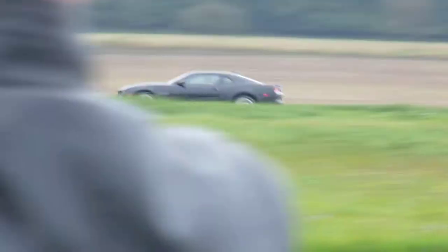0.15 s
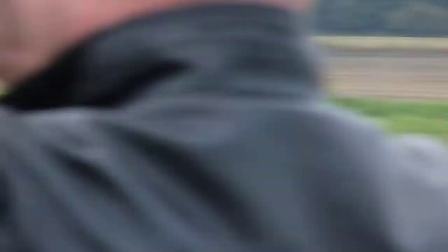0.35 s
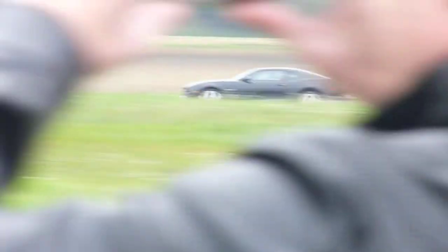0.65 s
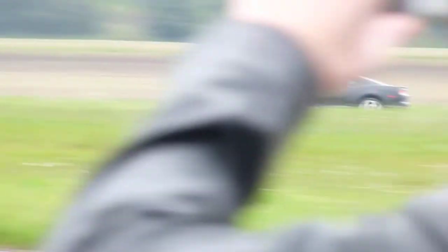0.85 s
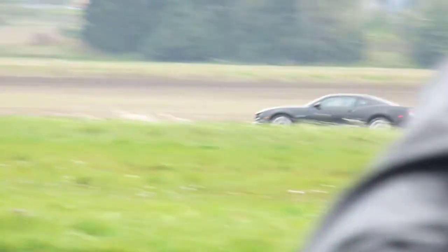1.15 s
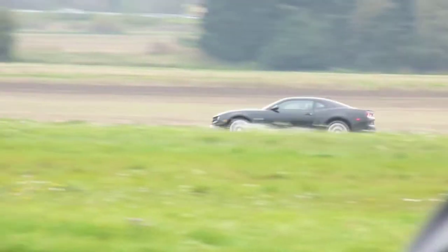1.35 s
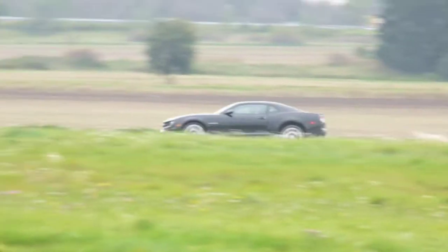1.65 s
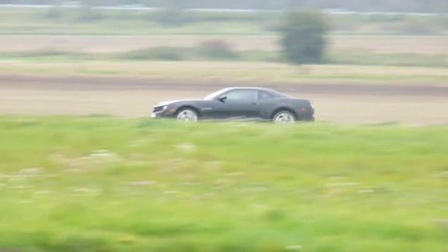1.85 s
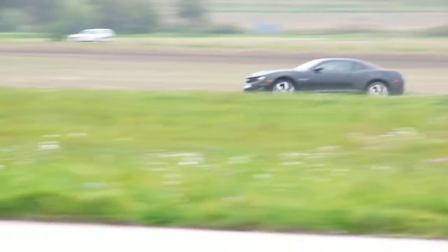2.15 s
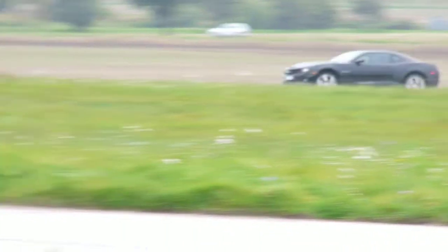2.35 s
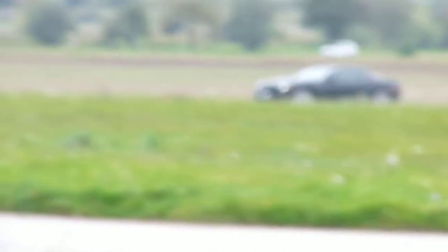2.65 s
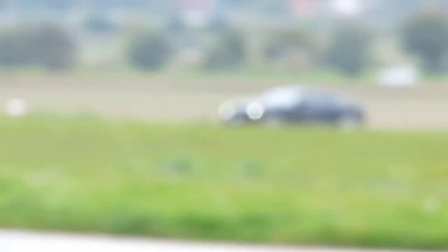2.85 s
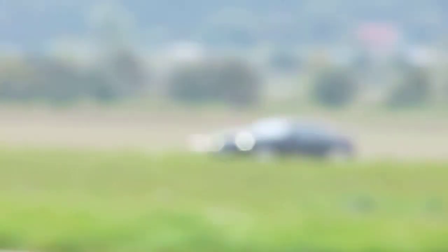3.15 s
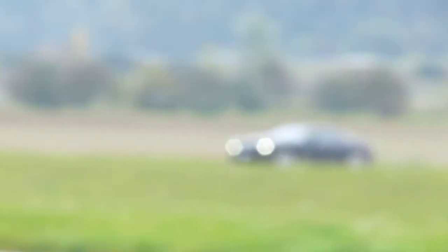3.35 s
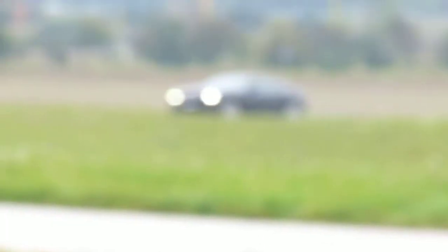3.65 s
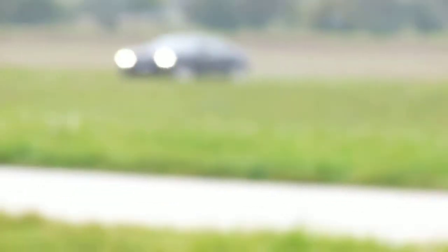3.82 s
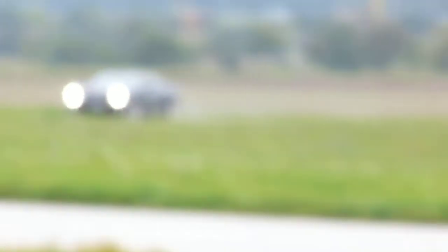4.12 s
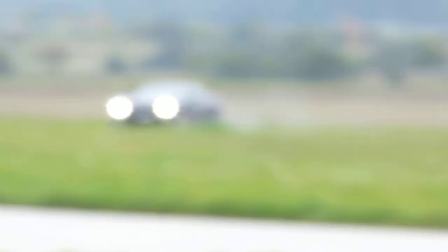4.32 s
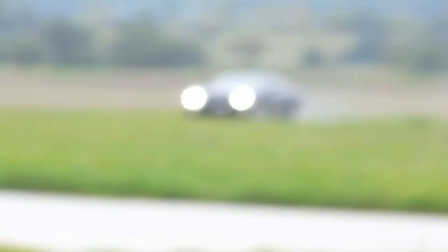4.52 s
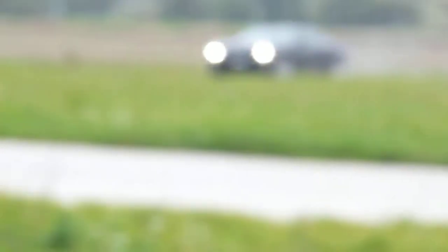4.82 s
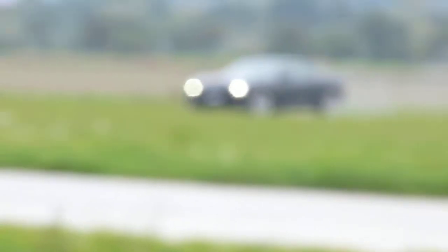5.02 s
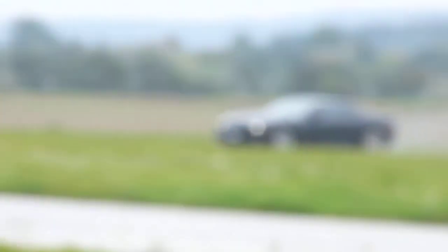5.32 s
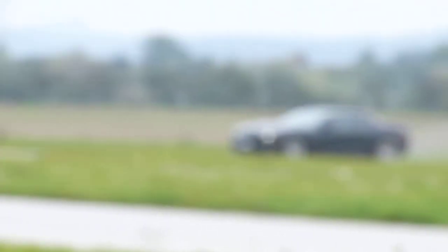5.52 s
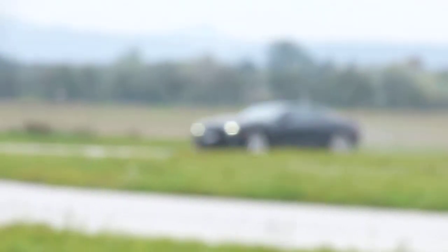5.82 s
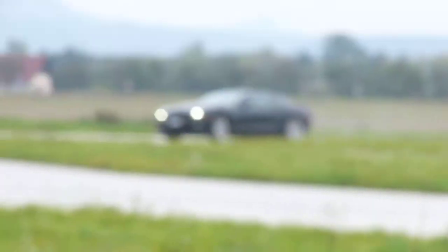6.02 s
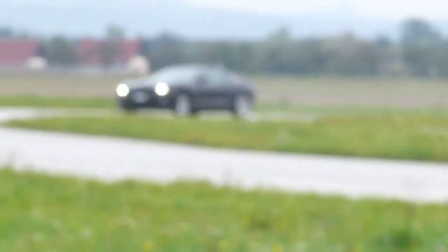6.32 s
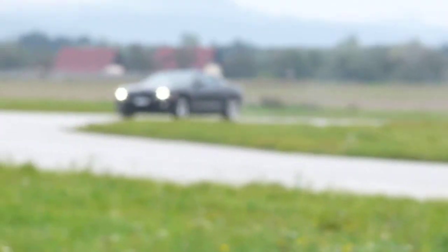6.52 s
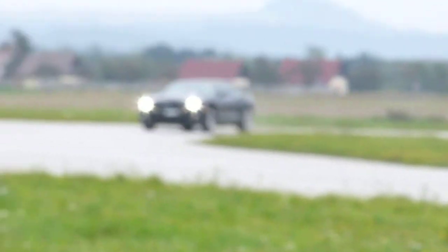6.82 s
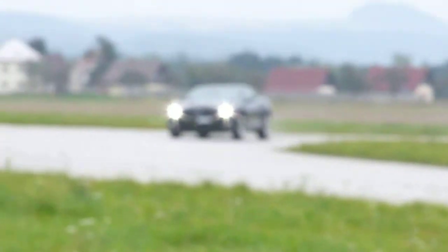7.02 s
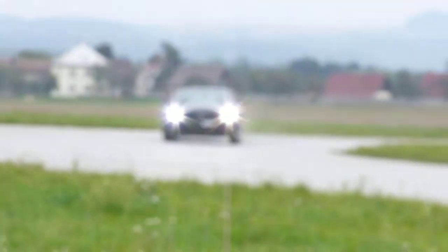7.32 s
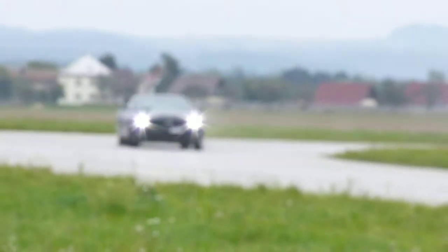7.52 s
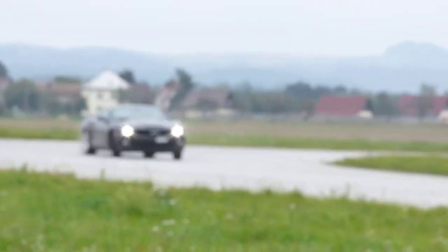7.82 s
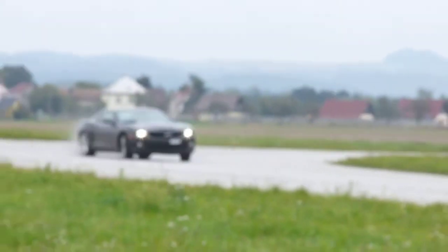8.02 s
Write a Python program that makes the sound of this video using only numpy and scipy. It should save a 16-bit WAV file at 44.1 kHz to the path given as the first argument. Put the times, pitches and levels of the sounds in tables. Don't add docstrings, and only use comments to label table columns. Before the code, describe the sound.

Distant heavy car slides through two bends, tyres squealing waveringly over scrubbing and low exhaust hum, with a strong wind gust buffeting the microphone between.

```python
import sys
import numpy as np
from scipy import signal
from scipy.fft import rfft, irfft, next_fast_len
from scipy.io import wavfile

SR = 44100
rng = np.random.default_rng(int(sys.argv[2]) if len(sys.argv) > 2 else 0)


def unload_audio(sound):
    columns = np.transpose(np.atleast_2d(sound))
    steps = np.round(np.clip(columns, -1, 1) * 32767)
    wavfile.write(sys.argv[1], SR, steps.astype(np.int16))


def voltage_ratio(level):
    return 10 ** (np.asarray(level, float) / 20)


N = 360297

# time in seconds, buffeting in dB.
WIND = [(0.3, -61.5), (1.09, -52.5), (2.07, -54), (3.0, -65), (3.48, -53), (4.84, -78), (4.99, -30.5),
        (5.04, -45), (5.23, -35), (5.29, -49), (5.36, -38.5), (5.5, -47.5), (5.56, -24), (5.67, -34.5),
        (6.56, -28), (7.4, -37.5), (7.59, -32.5), (8.17, -34.5)]
# frequency in Hz, density in dB per Hz.
BUFFET_COLOUR = [(18, -49.5), (30, -14), (126, -5), (302, -9), (802, -21), (922, -32), (1080, -28),
                 (1740, -40), (2550, -70.5), (3500, -81.5), (4550, -101), (7700, -120)]
# start in seconds, peak in dB.
EDDIES = [(0.106, -29), (0.282, -27), (0.748, -26.5), (0.866, -21.5), (1.065, -22), (1.363, -26),
          (2.854, -24.5), (3.225, -25), (3.293, -22), (3.356, -22), (3.812, -22.5), (3.859, -21),
          (3.967, -21.5), (4.31, -27), (4.896, -22), (5.208, -18.5), (5.353, -18.5), (5.421, -18.5),
          (5.546, -22), (5.65, -16), (5.774, -21), (5.81, -13.5), (6.044, -11), (6.112, -16.5),
          (6.209, -14), (6.255, -9.5), (6.532, -15), (7.03, -14), (7.539, -25), (8.104, -16)]
# start in seconds, peak in dB.
SNAPS = [(5.475, -31), (5.549, -37), (5.576, -25.5), (5.63, -26), (5.653, -20), (5.688, -25), (5.803, -27),
         (5.825, -17), (5.912, -43), (5.964, -25.5), (6.01, -23.5), (6.07, -25.5), (6.113, -27.5),
         (6.212, -17), (6.283, -19)]
RUMBLE_DB, RUMBLE_FOLLOWS = -39.5, 0.41
CLUSTER_DB, CLUSTER_S = 2.5, 0.16
SWAY_DB = -10
EDDY_HZ, EDDY_OCTAVES_PER_DB, EDDY_SCATTER = 135, .025, .15

# time in seconds, rolling in dB, scrubbing in dB.
RUBBER = [(0.0, -61, -90), (0.04, -57.5, -81), (1.91, -49.5, -77.5), (2.25, -42.5, -59), (2.37, -43, -49),
          (2.48, -45.5, -58.5), (3.09, -52, -51.5), (3.39, -53, -57.5), (3.89, -45, -50.5),
          (5.05, -54.5, -55), (5.21, -55, -55.5), (5.35, -58, -71.5), (5.58, -63, -86.5),
          (6.1, -56.5, -69.5), (6.78, -52, -56.5), (8.17, -33, -50.5)]
# frequency in Hz, density in dB per Hz.
ROLLING_COLOUR = [(180, -10), (300, -19.5), (476, -21), (528, -6.5), (638, -5), (694, -11.5), (950, 1.5),
                  (1150, -6), (1550, -16), (2170, -20.5), (3670, -37), (4770, -69.5), (8070, -120)]
# frequency in Hz, density in dB per Hz.
SCRUB_COLOUR = [(600, -27), (800, -6.5), (1000, -10.5), (1200, -20), (1500, -2), (1750, -13.5),
                (2050, -25.5), (2500, -19), (3200, -26.5), (4500, -47.5), (6500, -31.5)]
# time in seconds, level in dB.
TREAD = [(.5, -73), (.8, -55), (1.3, -71), (1.7, -59), (1.95, -55)]
# time in seconds, frequency in Hz.
TREAD_HZ = [(.5, 537), (1.95, 539)]

# time in seconds, slip rate in Hz, level in dB.
FRONT = [(1.85, 927, -60), (1.99, 975, -38), (2.25, 956, -58.5), (2.5, 990, -57), (3.05, 915, -46.5),
         (3.7, 925, -35), (4.58, 952, -30.5), (5.0, 925, -33.5), (5.3, 945, -57)]
# time in seconds, slip rate in Hz, level in dB, rasp in dB.
FRONT_AGAIN = [(6.3, 927, -60, -83), (6.45, 918.6, -45.5, -72), (6.67, 936.5, -40.5, -54),
               (6.88, 907.3, -41, -65.5), (7.15, 929.6, -26.5, -52.5), (7.4, 950, -27.5, -51),
               (7.56, 913, -42.5, -54), (7.68, 906, -34, -43), (8.16, 932.7, -30.5, -45)]
# time in seconds, change in dB.
FRONT_SWELLS = [
    (2.71, 7),
    (4.07, 6),
    (4.36, -7),
    (4.58, 2.5),
]

# time in seconds, share of the loaded tyre's slip rate, level in dB.
INNER = [(1.9, 0.85, -39.5), (2.1, 0.72, -47.5), (2.2, 0.76, -38), (2.3, .84, -49), (3.65, .837, -37.5),
         (3.9, 0.82, -44), (4.36, .82, -40.5), (4.9, 0.9, -34), (5.4, .87, -64)]
# time in seconds, change in dB.
INNER_SWELLS = [(2.55, -3), (2.95, 2), (3.17, -6.5), (3.53, 2), (3.76, -7.5), (4.05, 3), (4.6, 2)]
INNER_BITE_DB, INNER_BITE_FOLLOWS = -46.5, 0.21
# from and to, in seconds.
INNER_BITES_S = (2.08, 5.38)

# time in seconds, slip rate in Hz, level in dB, bite (2nd partial over 1st) in dB.
REAR = [(2.0, 900, -41, -17.5), (2.18, 866.5, -29.5, -6), (2.3, 733, -36, 1), (2.46, 739.6, -39, 7),
        (2.56, 821.4, -31, -6.5), (2.81, 821, -28, -7), (2.98, 752, -43, 17), (3.1, 753.6, -39, 12),
        (3.33, 816.7, -34, -6), (3.74, 879, -33, -5.5), (3.9, 850.5, -32, -11), (5.02, 865.7, -34, -7.5),
        (5.13, 800.2, -46, 13.5), (5.28, 790.3, -53, 19.5), (5.47, 845.7, -65.5, 14.5),
        (6.2, 839.6, -56.5, 13.5), (6.95, 765.7, -54, 10), (8.16, 754, -36.5, -11)]
# time in seconds, 1st partial change in dB, 2nd partial change in dB.
GRABS = [(2.24, -6, -7), (2.66, -2.5, -8), (2.87, 0, 4), (3.01, -1, -5), (3.2, -1.5, 3), (3.54, 6, -7),
         (3.85, -1, -10), (4.16, 8, -3), (4.45, -1, 8), (4.64, 4.5, -6), (4.82, 1.5, 5.5),
         (4.96, -0.5, -11), (5.07, 5, 7), (6.61, 5, 4), (7.13, -2, -13), (7.3, -3, 9.5), (7.98, 6, -9)]
# from and to in seconds, pitch spread as a share.
RAGGED = [
    (3.6, 4.6, .024),
    (6.0, 7.5, .038),
]
# time in seconds, 2nd partial in dB.
CHIRP = [
    (2.31, -40),
    (2.36, -25.5),
    (2.39, -41),
]
# from and to, in seconds.
STRAIGHT_S = (5.49, 6.16)
GRAB_S, SAG_HZ_PER_DB = .06, 2
CLEAN_SLIP = .012
RASP_DB, RASP_FOLLOWS, RAGGED_RASP_DB = -59, .65, 3

# open and shut in seconds, 5th order in dB, top speed in cycles per second, climb in seconds.
THROTTLE = [
    (2.442, 2.841, -34, 26.6, .11),
    (3.078, 4.974, -41, 30.3, .55),
]
# order of the cycle, level under the 5th in dB.
WEAK_ORDERS = [(3, -17), (4, -28), (6, -18.5)]
EIGHTH_DB, EIGHTH_FADE_DB = -4, 8
COAST_CYCLES, COAST_DB = 24.3, -51.5
OPEN_S, SPIN_DOWN_S = .1, .1

# frequency in Hz, density in dB per Hz.
HISS_COLOUR = [(60, -3.5), (4000, 1), (7400, 0.5), (8000, -4.5), (8800, -22)]
HISS_DB = -68.5
# frequency in Hz, level in dB.
WHINE = [(6665, -86.5)]
MICROPHONE_TOP_HZ = 3540
CEILING = .36
OFFSET = -.0051


def rms_one(x):
    return x / np.sqrt(np.mean(x ** 2) + 1e-20)


def in_time(rows):
    s, *columns = np.transpose(rows)
    t = np.arange(N) / SR
    gate = np.clip(np.minimum(t - s[0], s[-1] + .04 - t) / .04, 0, 1)
    return [np.interp(t, s, c) for c in columns] + [gate]


def bumps(rows, width=GRAB_S):
    s, *columns = np.transpose(rows)
    coarse = np.arange(0, N + 64, 64)
    bells = np.exp(-.5 * ((coarse[:, None] / SR - s) / width) ** 2)
    return [np.interp(np.arange(N), coarse, bells @ c) for c in columns]


def held(start, end, edge):
    t = np.arange(N) / SR
    return np.clip(np.minimum(t - start, end - t) / edge + .5, 0, 1)


def drift(rate):
    r = np.exp(-40 * np.pi * rate / SR)
    slow = signal.lfilter([1], [1, -2 * r, r * r], rng.standard_normal(N // 20 + 2002))[2000:]
    return np.interp(np.arange(N) / 20, np.arange(len(slow)), rms_one(slow))


def coloured(spectrum):
    hz, level_db = np.transpose(spectrum)
    size = next_fast_len(N)
    grid = np.maximum(np.arange(size // 2 + 1) * SR / size, 1)
    shape = voltage_ratio(np.interp(np.log(grid), np.log(hz), level_db, left=-120, right=-120))
    return rms_one(irfft(rfft(rng.standard_normal(size)) * shape, size)[:N])


def band(x, low_hz, high_hz):
    return signal.sosfilt(signal.butter(2, [low_hz, high_hz], "band", fs=SR, output="sos"), x)


def squeal(rate, partials, wobble, flutter_db, rasp=.024):
    turns = np.cumsum(rate * (1 + wobble * (drift(89.6) + .22 * drift(11)))) / SR
    grip = drift(15)
    out = 0
    for k, db in partials:
        smear = (k > 2) * np.cumsum(rate * rasp * drift(110)) / SR
        level = voltage_ratio(db + flutter_db * (grip + 0.97 * drift(53)))
        out = out + level * np.sin(2 * np.pi * k * (turns + smear))
    return np.sqrt(2) * out


def wind():
    buffet_db, _ = in_time(WIND)
    crowding = bumps([(s, 1) for s, db in EDDIES], CLUSTER_S)[0]
    rumble_db = RUMBLE_DB + RUMBLE_FOLLOWS * (buffet_db + 34.5)
    rumble_db += CLUSTER_DB * np.minimum(crowding, 2)
    lumps, air = drift(26), coloured(BUFFET_COLOUR)
    low = band(band(rng.standard_normal(N), 63, 216), 31, 270)
    rumble = voltage_ratio(rumble_db + 3.5 + 2.0 * lumps) * rms_one(low)
    body = voltage_ratio(buffet_db + 3.5 + 3.7 * lumps) * rms_one(band(air, 146.4, 555))
    flare_db = 0.51 * (buffet_db + 31) - 45.5 + 1.2 * lumps + 6.98 * drift(200)
    flare = voltage_ratio(flare_db) * rms_one(band(air, 500, 5100))
    sway_db = .7 * (rumble_db + 40) - 37 + SWAY_DB + 3.0 * drift(5)
    sway = voltage_ratio(sway_db) * rms_one(band(rng.standard_normal(N), 20, 55))
    return rumble + body + flare + sway


def rubber():
    rolling_db, scrub_db, _ = in_time(RUBBER)
    rolling = voltage_ratio(rolling_db + 1.5 + 1.2 * drift(1.5)) * coloured(ROLLING_COLOUR)
    grain_db = 3.26 * drift(12) + 0.45 * drift(70)
    return rolling + voltage_ratio(scrub_db + 15 + grain_db) * coloured(SCRUB_COLOUR)


def eddies():
    out = np.zeros(N + SR)
    for s, peak_db in EDDIES:
        at = int(s * SR)
        octaves = EDDY_OCTAVES_PER_DB * (peak_db + 24) + EDDY_SCATTER * rng.standard_normal()
        low_hz = EDDY_HZ * 2 ** octaves
        for hz, db in ((low_hz, -3), (1.966 * low_hz, -10)):
            turns = np.arange(int(5 / hz * SR)) / SR * hz
            swell = (turns / 0.74) ** 2 * np.exp(2 - 2 * turns / 0.9)
            swing = np.sin(2 * np.pi * (turns + rng.random()))
            out[at:at + len(turns)] += voltage_ratio(peak_db + db) * swell * swing
    return out[:N]


def tread_hum():
    hum, gate = in_time(TREAD)
    return gate * squeal(in_time(TREAD_HZ)[0], [(0.98, hum)], wobble=0.0253, flutter_db=2.5)


def front_tyres():
    rate, first, gate = in_time(FRONT)
    first = first + bumps(FRONT_SWELLS)[0]
    out = gate * squeal(rate, [(0.98, first - 2.5)], wobble=0.0301, flutter_db=2.0)
    out += gate * squeal(1.06 * rate, [(0.95, first - 8)], wobble=0.03754, flutter_db=5.0)
    rate, first, third, gate = in_time(FRONT_AGAIN)
    partials = [(1, first - 2.5), (2.01, first - 25), (2.92, third - 1.0)]
    out += gate * squeal(rate, partials, wobble=.019, flutter_db=2.4, rasp=.013)
    for share in (.9, 1.1):
        partials = [(1, first - 11), (3.55, third - 13)]
        out += gate * squeal(share * rate, partials, wobble=0.027, flutter_db=2.5, rasp=.06)
    return out


def inner_rear_tyre():
    share, first, gate = in_time(INNER)
    first = first + bumps(INNER_SWELLS, width=0.088)[0]
    second = INNER_BITE_DB + INNER_BITE_FOLLOWS * (first + 43) + 2.4 * drift(5.1)
    second = second - 16 * (1 - held(*INNER_BITES_S, 0.1))
    partials = [(1, first - 1.5), (2, second)]
    return gate * squeal(share * in_time(REAR)[0], partials, wobble=0.015, flutter_db=3.0)


def rear_slip():
    rate, level, bite, gate = in_time(REAR)
    sing, grab = bumps(GRABS)
    sliding = gate * (1 - held(*STRAIGHT_S, 0.065))
    return rate - SAG_HZ_PER_DB * grab, level + sing, level + bite + grab, sliding


def loaded_rear_tyre():
    ragged = CLEAN_SLIP
    for start, end, spread in RAGGED:
        ragged = ragged + (spread - CLEAN_SLIP) * held(start, end, .2)
    rate, first, second, gate = rear_slip()
    bite = 1.4 * (second + 28)
    third = RASP_DB + RASP_FOLLOWS * (second + 40) + .5 * np.minimum(first + 52, 0)
    third = third + RAGGED_RASP_DB * np.minimum(ragged / CLEAN_SLIP - 1, 1)
    partials = [(1, first - 1.5), (2, second - 1.5), (3, third), (4, bite - 53), (6, bite - 68)]
    return gate * squeal(rate, partials, wobble=ragged, flutter_db=2.5)


def engine():
    t, out = np.arange(N) / SR, 0
    for on, off, fifth_db, top, climb in THROTTLE:
        rise = 1 - np.exp(-np.maximum(t - on, 0) / climb)
        fall = np.exp(-np.maximum(t - off, 0) / SPIN_DOWN_S)
        revs = COAST_CYCLES + (top - COAST_CYCLES) * rise * fall
        turns = 2 * np.pi * np.cumsum(revs * (1 + 0.0025 * drift(4.3))) / SR
        eighth_db = fifth_db + EIGHTH_DB - EIGHTH_FADE_DB * np.maximum(revs - 26, 0)
        drone = voltage_ratio(fifth_db + 1.5 * drift(5)) * np.sin(5 * turns)
        drone += voltage_ratio(eighth_db + 2 * drift(5)) * np.sin(8 * turns)
        for k, db in WEAK_ORDERS:
            drone += voltage_ratio(fifth_db + db + 4.0 * drift(6.4)) * np.sin(k * turns)
        coasting = voltage_ratio(COAST_DB) * held(on - .35, on, OPEN_S) * np.sin(8 * turns)
        out = out + np.sqrt(2) * (held(on, off, OPEN_S) * drone + coasting)
    return out


def chirp():
    bite, gate = in_time(CHIRP)
    partials = [(2, bite), (3, bite - 20), (4, bite - 14), (6, bite - 25)]
    return gate * squeal(rear_slip()[0], partials, wobble=.018, flutter_db=2.5, rasp=.025)


def snaps():
    s, peak_db = np.transpose(SNAPS)
    strikes = np.zeros(N)
    strikes[(s * SR).astype(int)] = voltage_ratio(peak_db + 8.0)
    fade = np.exp(-1 / (0.0029 * SR))
    swell = signal.lfilter([1 - fade], [1, -2 * fade, fade * fade], strikes)
    return swell * rms_one(band(coloured(BUFFET_COLOUR), 250, 2500))


def scene():
    tyres = rubber() + tread_hum() + front_tyres() + inner_rear_tyre() + loaded_rear_tyre() + chirp()
    air = wind() + eddies() + snaps()
    return (tyres + engine() + air)[None]


def band_limit(x):
    return signal.sosfilt(signal.butter(12, 8870, fs=SR, output="sos"), x)


def record(dry):
    rounded = CEILING * np.tanh(dry / CEILING)
    dull = signal.sosfilt(signal.butter(4, MICROPHONE_TOP_HZ, fs=SR, output="sos"), rounded)
    t = np.arange(N) / SR
    whine = sum(np.sqrt(2) * voltage_ratio(db) * np.sin(2 * np.pi * hz * t) for hz, db in WHINE)
    hiss = voltage_ratio(HISS_DB) * coloured(HISS_COLOUR)
    return band_limit(dull + hiss + whine + OFFSET)


dry = scene()
out = record(dry)
unload_audio(out)
```